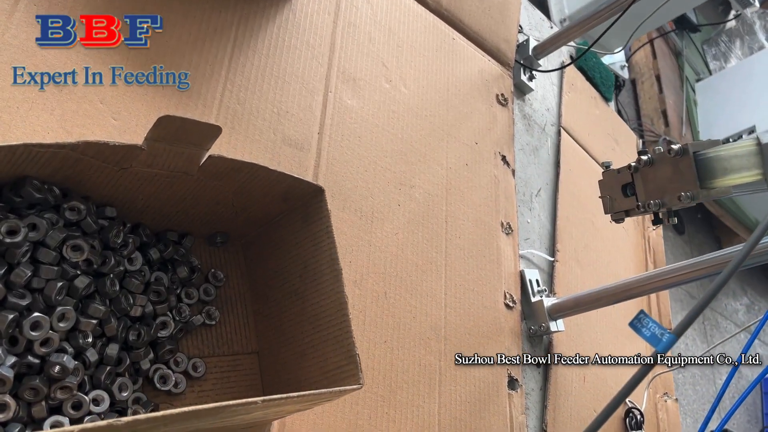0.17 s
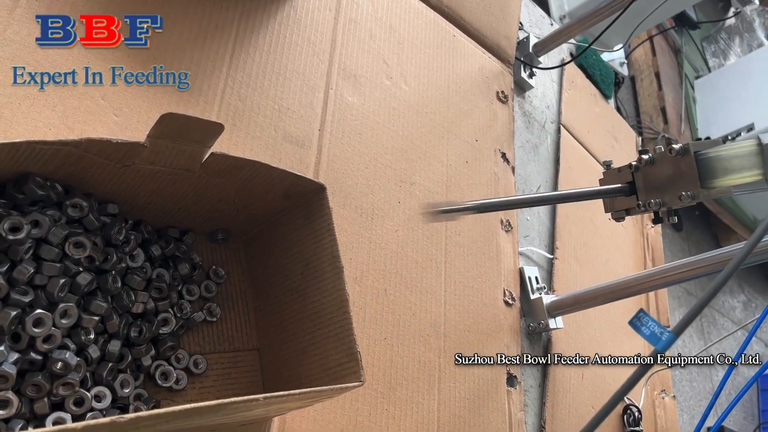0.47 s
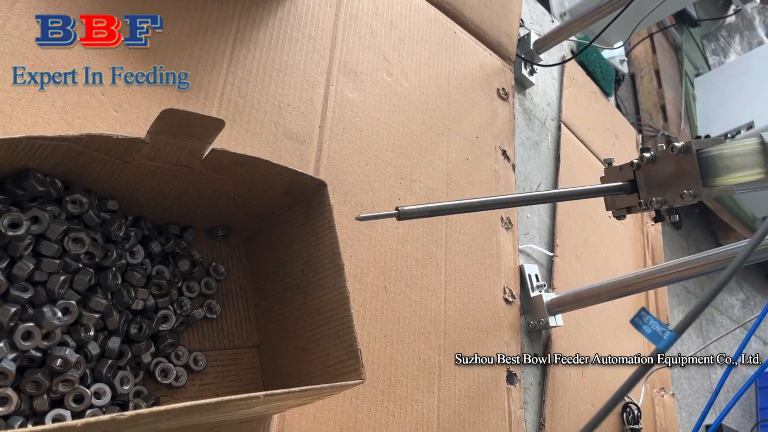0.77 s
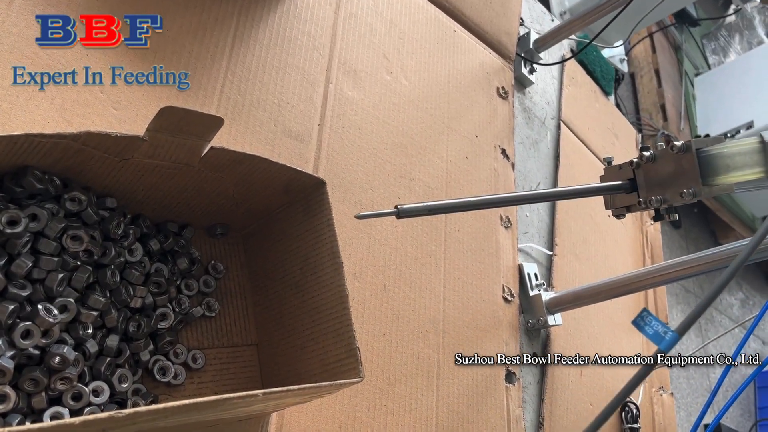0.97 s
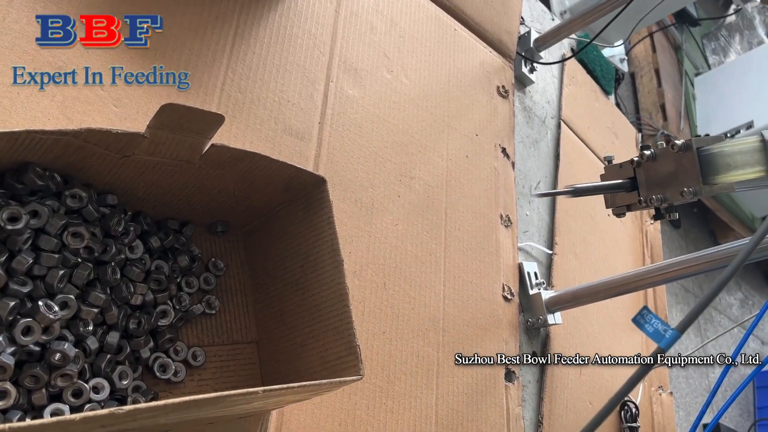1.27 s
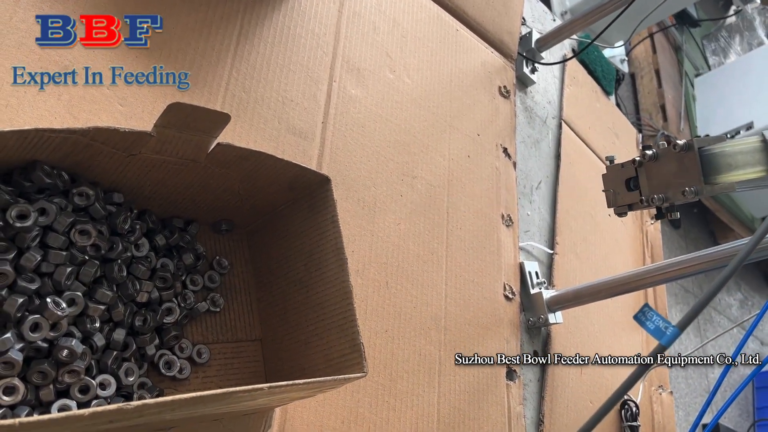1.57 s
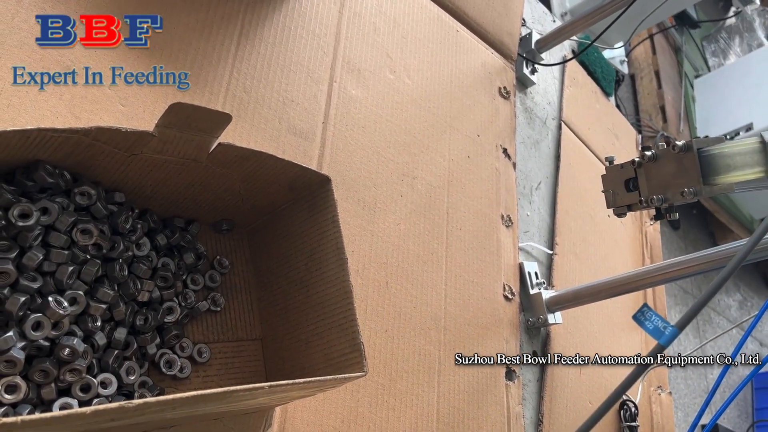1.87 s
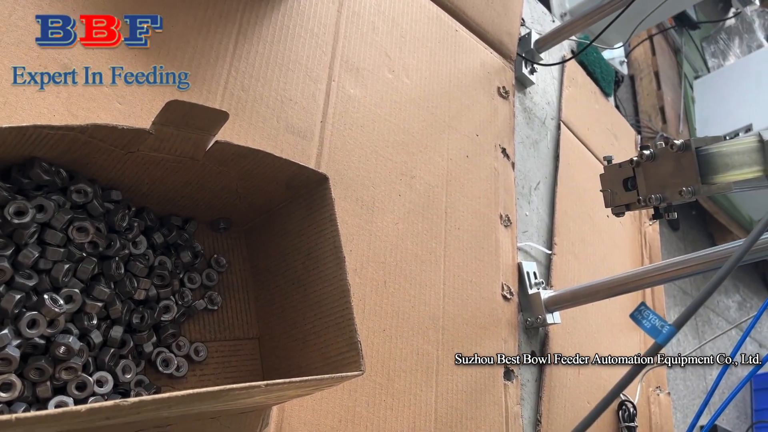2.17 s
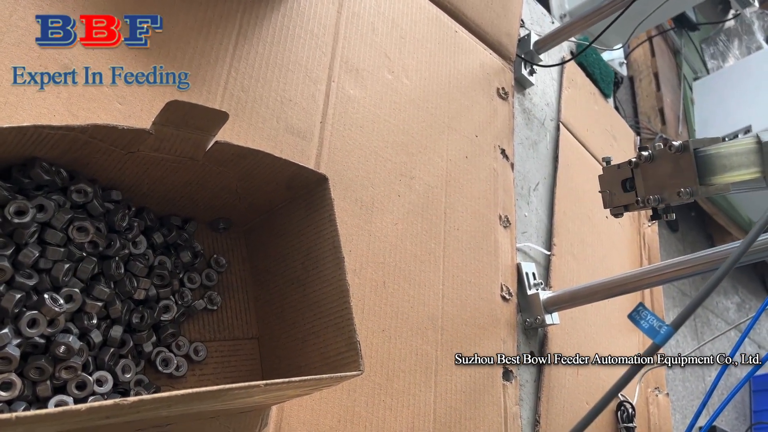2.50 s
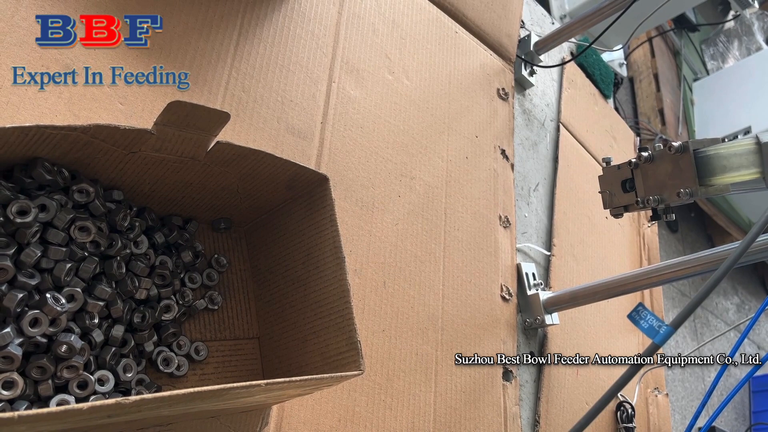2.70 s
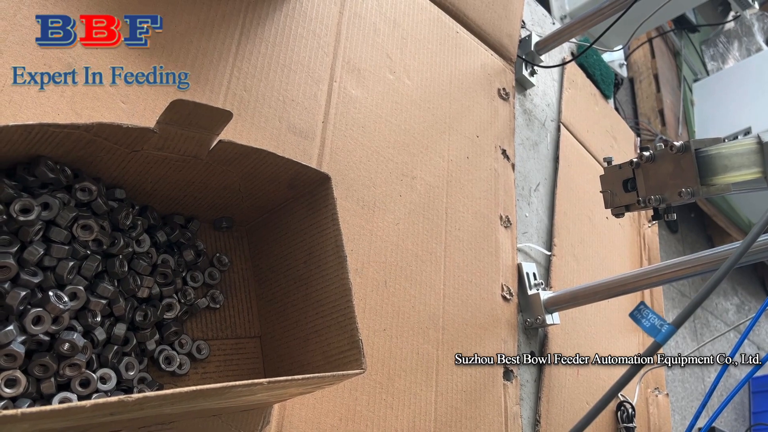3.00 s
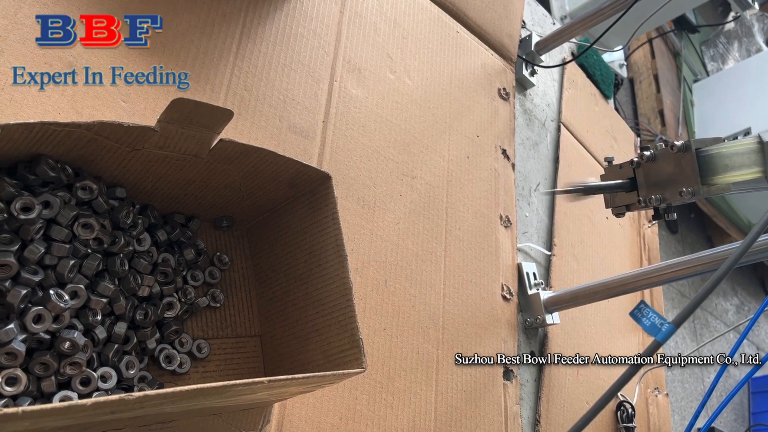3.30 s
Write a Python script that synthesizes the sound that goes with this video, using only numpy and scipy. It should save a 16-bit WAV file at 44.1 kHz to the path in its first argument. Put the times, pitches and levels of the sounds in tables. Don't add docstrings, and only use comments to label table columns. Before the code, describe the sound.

Pneumatic feeder's air jet hisses on and off while a metal rod slams and rings

```python
import sys
import numpy as np
from scipy import signal
from scipy.fft import rfft, irfft, next_fast_len
from scipy.io import wavfile
from scipy.ndimage import uniform_filter1d, map_coordinates

SR = 44100
rng = np.random.default_rng(int(sys.argv[2]) if len(sys.argv) > 2 else 0)


def output_pcm(signal):
    pcm = np.clip(np.atleast_2d(signal).T, -1, 1) * 32767
    wavfile.write(sys.argv[1], SR, np.round(pcm).astype(np.int16))


def attenuation_scalar(level_db):
    decades = np.asarray(level_db, float) / 20
    return 10 ** decades


N = 152145

# [t/s, level/dB]
JET = [(0, -24), (.3, -22.5), (.42, -25.5), (.45, -30), (.55, -47), (.7, -71), (1.528, -70), (1.537, -30),
       (1.548, -22), (1.702, -20.5), (2, -23.5), (2.02, -19), (2.6, -21), (2.71, -23), (2.73, -32),
       (2.85, -48), (3, -86)]
# [t/s, level/dB, whistle start f/Hz, whistle level/dB]
VENTS = [
    (0.71, -25.5, 6450, 7),
    (0.942, -30, 4970, -4),
    (1.425, -27, 5880, 7.5),
    (3.011, -25.5, 6680, 6.5),
    (3.138, -29, 6900, 3.5),
    (0.233, -30, 6600, 6.5),
]
# [t/s, peak level/dB]
LATCH_TICKS = [(0.5405, -21), (.547, -25), (0.637, -22.5), (.651, -25.5), (0.786, -16), (0.825, -7),
               (0.8374, -24), (1.4046, -25), (3.0869, -12.5), (3.1253, -7.5), (3.1374, -22)]
# [t/s, peak level/dB, weight on low modes/dB]
PAWL_TICKS = [
    (0.3169, -8, -4),
    (0.3507, -10.5, 8.5),
    (3.215, -9.5, -4),
    (3.2503, -6.5, 3),
]


def unit(x):
    return x / np.sqrt(np.mean(x ** 2) + 1e-20)


def along(points, hz):
    f, v = np.transpose(points)
    return np.interp(np.log(hz + 1), np.log(f + 1), v)


def wobble(rate_hz, size=N):
    knots = rng.standard_normal(int(size * rate_hz / SR) + 4)
    return map_coordinates(knots, [np.arange(size) * rate_hz / SR])


def filtered(x, response):
    m = next_fast_len(N + SR // 2)
    return irfft(rfft(x, m) * response(np.fft.rfftfreq(m, 1 / SR)), m)[..., :N]


def rush(colour, patchy_db, resonances=()):
    # [f/Hz, correlation]
    alike = [(60, .99), (300, 0.31), (1500, 0.53), (5000, 0.4), (8000, 0.77), (15000, 0.84)]
    air_top_hz = 15850
    z = signal.stft(rng.standard_normal((2, N)), nperseg=512)[2]
    field = uniform_filter1d(rng.standard_normal(z.shape[1:]), 5, axis=0)
    field = uniform_filter1d(field, 8, axis=1)
    pair = signal.istft(z * attenuation_scalar(patchy_db * unit(field)), nperseg=512)[1][:, :N]

    def response(hz):
        angle = np.arccos(np.clip(along(alike, hz), -1, 1)) / 2
        lift = 1 + sum(attenuation_scalar(db) / (1 + (2 * (hz - c) / w) ** 2) for c, w, db in resonances)
        return attenuation_scalar(along(colour, hz)) * lift * (hz < air_top_hz) * [np.cos(angle), np.sin(angle)]

    mid, side = filtered(pair, response)
    return unit(np.array([mid + side, mid - side]))


def swell(events, rise_s, t60_s):
    t = np.arange(N) / SR
    out = 0
    for s, db in events:
        age = np.clip(t - s, 0, None)
        out = out + attenuation_scalar(db - 60 * age / t60_s) * (1 - np.exp(-age / rise_s))
    return out


def ring(modes, spread, rough, flutter):
    t, out = np.arange(SR * 3 // 5) / SR, 0
    for hz, db, t60_s in modes:
        drift_s = np.cumsum(1 + rough * wobble(61.4, size=len(t))) / SR
        port_phase = spread * min(hz / 800, 1) * rng.standard_normal((2, 1))
        phase = rng.uniform(0, 2 * np.pi) + port_phase
        beat = wobble(30, size=len(t))
        size = np.cos(flutter * (beat - beat[0])) * attenuation_scalar(db + rng.normal(0, 1) - 60 * t / t60_s)
        out = out + size * np.sin(2 * np.pi * hz * drift_s + phase)
    return out * (1 - np.exp(-t / 0.000095))


def add(track, s, sound):
    part = track[:, round(s * SR):][:, :sound.shape[1]]
    part += sound[:, :part.shape[1]]


def jet():
    # [f/Hz, level/dB]
    colour = [(300, -98), (900, -11.5), (2000, -9.5), (5000, -10), (8500, -4), (12000, -5.5), (15500, -7.5),
              (16200, -40)]
    # [f/Hz, width/Hz, level/dB]
    pipe = [(1253, 535, 12.5), (1980, 100, 3.5), (3087, 340, 3), (3800, 440, -9), (4420, 1100, 6),
            (6900, 130, 3.5), (9600, 310, -2), (10700, 260, 2.5)]
    # [t/s, share]
    gap_lift = [
        (0, 0.59),
        (1.5, -0.55),
        (1.98, -0.73),
        (2.03, -0.15),
        (2.5, 0.43),
        (2.75, 0.47),
    ]
    gap_hz, gap_width_hz = 1490, 290
    t = np.arange(N) / SR
    flow = attenuation_scalar(np.interp(t, *np.transpose(JET)) + 0.6 * wobble(13))
    air = rush(colour, 0.85, pipe)
    gap = filtered(air, lambda hz: 1 / (1 + (2 * (hz - gap_hz) / gap_width_hz) ** 2))
    return flow * (air + np.interp(t, *np.transpose(gap_lift)) * gap)


def shop():
    # [f/Hz, rms level/dB]
    partials = [(80.7, -38), (113.0, -35.5), (177.6, -47), (220.7, -44.5), (366.1, -51.5), (576.0, -54)]
    # [f/Hz, level/dB]
    colour = [(30, -24), (55, -1), (130, -11.5), (400, -11.5), (1200, -13), (2500, -18.5), (6000, -22.5),
              (15800, -37)]
    # [t/s, level/dB]
    machines = [(0, -33.5), (.4, -32.5), (1, -32), (1.45, -31.5), (1.6, -31), (2.05, -32), (2.2, -35.5),
                (2.6, -34), (2.75, -30), (2.95, -35), (3.45, -30.5)]
    t = np.arange(N) / SR
    hum = 0
    for hz, db in partials:
        level = np.sqrt(2) * attenuation_scalar(db + 1.2 * wobble(4.98))
        hum = hum + level * np.sin(2 * np.pi * hz * t + 1.35 * wobble(3.92))
    level_db = np.interp(t, *np.transpose(machines)) + 1.54 * wobble(2.52) + 1.7 * wobble(30.44)
    return hum + attenuation_scalar(level_db) * rush(colour, 2.2)


def vents():
    # [f/Hz, level/dB]
    colour = [(1200, -22), (3000, -1), (5500, 5.5), (8000, -4.5), (11500, -0.5), (15500, -10), (16200, -45)]
    glide_s, glide_to, rough = 0.04, 0.64, 0.0402
    whistle_t60_s, overtone_db, left_db = 0.21, -14, 4
    out = swell([v[:2] for v in VENTS], 0.00091, 0.61) * rush(colour, 1.0)
    t = np.arange(SR // 3) / SR
    for s, db, hz, whistle_db in VENTS:
        glide = glide_to + (1 - glide_to) * np.exp(-t / glide_s)
        pitch_hz = hz * glide * (1 + rough * wobble(546, size=len(t)))
        phase = 2 * np.pi * np.cumsum(pitch_hz) / SR
        tone = np.sin(phase) + attenuation_scalar(overtone_db) * np.sin(2 * phase)
        tone = tone * attenuation_scalar(2.2 * wobble(500, size=len(t)))
        level = attenuation_scalar(db + whistle_db - 60 * t / whistle_t60_s) * (1 - np.exp(-t / 0.0077))
        add(out, s, level * tone * attenuation_scalar([[left_db], [-left_db]]))
    return out


def knocks():
    # [t/s, level/dB, f/Hz]
    dull_knocks = [(0.233, -31.5, 408), (.372, -18.5, 112), (.977, -15.5, 382.5), (1.379, -18.5, 253),
                   (1.386, -11, 485), (1.469, -28, 248), (1.474, -27.5, 504), (1.534, -22.5, 987),
                   (1.533, -22, 296), (1.72, -28, 470), (1.726, -19.5, 266), (1.812, -12, 412),
                   (1.813, -18.5, 574), (2.015, -24, 499), (3.006, -25, 402), (3.283, -23, 430)]
    t60_s = .12
    out = np.zeros((2, N))
    for s, db, hz in dull_knocks:
        modes = [(hz, 0, t60_s), (hz * 2.2, -14, t60_s / 2)]
        add(out, s, attenuation_scalar(db) * ring(modes, 1.0, 0.014, 0.31))
    return out


def ticks():
    # [f/Hz, level/dB, t60/s]
    latch = [(9250, 3, .012), (10600, -5, .006), (12200, -7, .006), (15200, -10, .006), (3150, -15, .1),
             (1510, -15, .4)]
    # [f/Hz, level/dB, t60/s]
    pawl = [(14900, 0, .012), (12000, -6, .01), (8600, -5, .016), (4600, -14, .03), (2900, -10, .06),
            (2600, -15, .3)]
    # [f/Hz, level/dB]
    clack_colour = [(300, 4), (800, 6.5), (1600, 8), (2800, 7), (4500, 2), (7000, -6), (16000, -18)]
    out, t = np.zeros((2, N)), np.arange(SR // 50) / SR
    strikes = [(s, db, latch) for s, db in LATCH_TICKS]
    for s, db, weight_db in PAWL_TICKS:
        modes = [(hz, level + weight_db * (hz < 9000), t60_s) for hz, level, t60_s in pawl]
        strikes.append((s, db, modes))
    for s, db, modes in strikes:
        add(out, s, attenuation_scalar(db - 3) * ring(modes, .3, .012, 1.5))
        crack = np.diff(rng.standard_normal(len(t) + 1))
        add(out, s, attenuation_scalar(db - 6 - 60 * t / 0.012) * crack * [[1], [1]])
    blows = LATCH_TICKS + [(s, db + 1.28 * weight_db) for s, db, weight_db in PAWL_TICKS]
    return out + attenuation_scalar(-21) * swell(blows, 0.00066, 0.62) * rush(clack_colour, 2)


def stops():
    # [t/s, peak level/dB, thump/dB]
    out_stops = [
        (0.465, -3, -0.5),
        (1.382, -15.5, 3),
        (3.364, -3.5, 2.5),
    ]
    # [f/Hz, level/dB, t60/s]
    out_body = [(270.6, 1.5, 0.18), (261.7, -3, 2.1), (488, 1.5, 0.72), (562, -10.5, 1.2), (700, -6, 0.8),
                (809, 0, 0.85), (994, 2.5, 0.7), (1335, 2, 0.26), (1580, 1, 0.4), (1876, -4, 0.26),
                (1920, -0.5, 0.17), (2577, -7, 0.46), (3015, -1, 0.07)]
    # [t/s, peak level/dB, thump/dB]
    in_stops = [
        (.973, -6, 0),
        (1.811, -13.5, -2),
        (2.012, -25.5, 8),
        (3.271, -5, -1),
    ]
    # [f/Hz, level/dB, t60/s]
    in_body = [(244, -3.5, 0.29), (386, -7.5, 0.21), (403.3, 1.5, 0.79), (470, -3, 0.79), (576.6, 1, 0.3),
               (794, -3, 0.69), (915, 2.5, 0.71), (988, -4, 0.77), (1258, -4.5, 0.61), (1470, 1.5, 0.66),
               (1514, 4.5, 0.28), (2170, -14, 0.33), (2650, -5.5, 0.38)]
    # [f/Hz, level/dB, t60/s]
    table = [(109.6, -1, 0.47), (123, -9.5, 0.6), (150.7, -7, 0.18)]
    # [f/Hz, level/dB]
    rattle_colour = [(60, -25), (110, -6.5), (300, -12), (1900, -12), (2400, -16.5), (5000, -23.5),
                     (10000, -37.5), (16000, -38)]
    chatter_s, chatter_loss_db, chatter_t60_s, rattle_t60_s = .024, 4, .09, 0.5
    ring_db, rattle_db, panel_width_hz, panel_lift_db = -16.5, -13.5, 74, 7
    thump_rise_s = .012
    out = np.zeros((2, N))
    rise = 1 - np.exp(-np.arange(SR * 3 // 5) / SR / thump_rise_s)
    for hits, body in ((out_stops, out_body), (in_stops, in_body)):
        blows = []
        for s, db, thump_db in hits:
            add(out, s, attenuation_scalar(db + thump_db - 7) * rise * ring(table, .2, .01, .3))
            add(out, s, attenuation_scalar(db + ring_db) * ring(body, .75, .006, .9))
            blows += [(s + k * chatter_s, db + rattle_db - k * chatter_loss_db) for k in range(3)]
        shake = swell(blows, .002, chatter_t60_s) + swell(blows[::3], .006, rattle_t60_s)
        panels = [(hz, panel_width_hz, db + panel_lift_db) for hz, db, t60_s in body]
        out += shake * attenuation_scalar(1.5 * wobble(90)) * rush(rattle_colour, 1.5, panels)
    return out


def room(x):
    # [f/Hz, t60/s]
    decay = [(150, 1), (1500, 0.74), (6000, 0.2), (14000, 0.085)]
    hz, t, z = signal.stft(rng.standard_normal((2, SR * 3 // 4)), SR, nperseg=256)
    apart = np.clip(hz / 1200, 0, 1)[:, None]
    z = np.array([z[0] + apart * z[1], z[0] - apart * z[1]])
    tail = signal.istft(z * attenuation_scalar(-60 * t / along(decay, hz)[:, None]), SR, nperseg=256)[1]
    late = np.pad(x.mean(axis=0), (300, 0))[None]
    return signal.fftconvolve(late, tail / np.linalg.norm(tail[0]), axes=1)[:, :N]


def scene():
    steel, rod = ticks(), stops() + knocks()
    return jet() + shop() + vents() + steel + rod + room(attenuation_scalar(-15) * steel + attenuation_scalar(-8) * rod)


def ports(dry):
    # [f/Hz, phase/rad]
    right_leads = [(0, 0), (400, -.25), (1700, 0), (3100, -.9), (4700, -.8), (5900, 1.1), (8300, 3.14),
                   (12000, 6.28), (15400, 9.42)]
    # [f/Hz, level/dB]
    left_over_right = [(200, 0.5), (1200, 0.5), (2800, 2.5), (6000, 2.5), (8000, 0)]
    top_hz, bass_cut_hz = 16480, 45

    def response(hz):
        half = np.log(10) / 40 * along(left_over_right, hz) - .5j * np.interp(hz, *np.transpose(right_leads))
        return np.exp([half, -half]) * (hz < top_hz) / (1 + (bass_cut_hz / (hz + 1)) ** 4)

    return filtered(dry, response)


def thin_bands(left, right):
    # [from f/Hz, to f/Hz, 0 = sum, 1 = difference]
    sealed = [(7750, 8850, 0), (15100, 17000, 0), (11100, 13000, 1), (15850, 17000, 1)]
    open_before_s, open_after_s = .015, .018

    def weak(hz):
        return [sum((hz > a) & (hz < b) for a, b, k in sealed if k == side) for side in (0, 1)]

    mid, side = filtered(np.array([left + right, left - right]) / 2, weak)
    t = np.arange(N) / SR
    sharp = LATCH_TICKS[1:] + PAWL_TICKS + [VENTS[0], VENTS[2], VENTS[3], JET[8]]
    is_open = np.any([(t > row[0] - open_before_s) & (t < row[0] + open_after_s) for row in sharp], axis=0)
    shut = 1 - uniform_filter1d(is_open * 1., 300)
    return np.array([left - shut * (mid + side), right - shut * (mid - side)])


def band_limit(x):
    return signal.sosfilt(signal.butter(12, 16480, fs=SR, output="sos"), x)


def record(dry):
    left, right = ports(dry)
    x = thin_bands(left, right)
    return band_limit(x / (1 + np.abs(x) ** 8) ** (1 / 8))


dry = scene()
out = record(dry)
output_pcm(out)
```